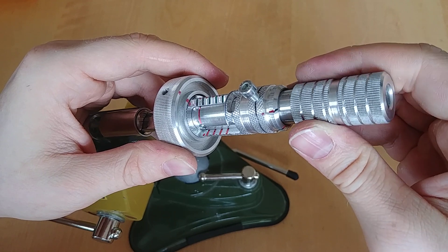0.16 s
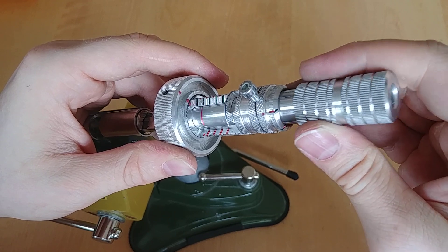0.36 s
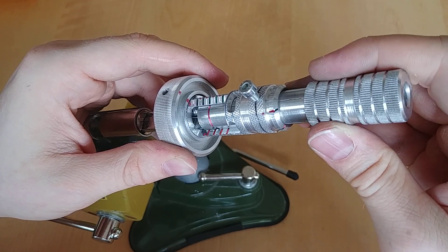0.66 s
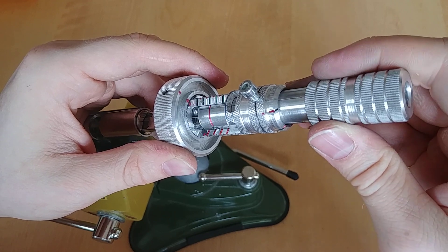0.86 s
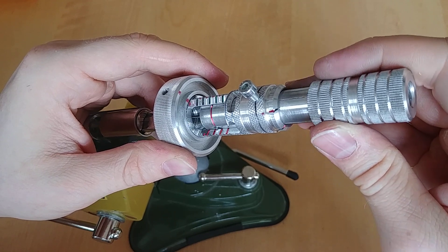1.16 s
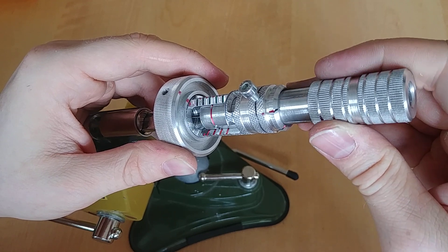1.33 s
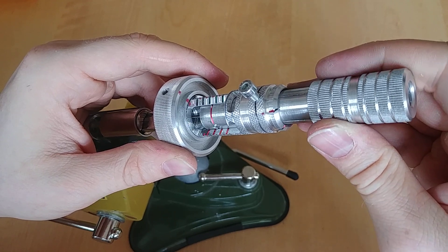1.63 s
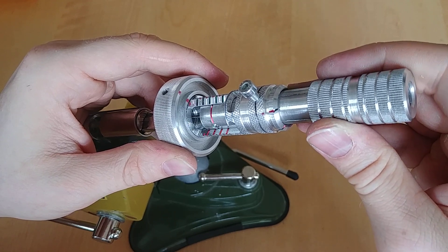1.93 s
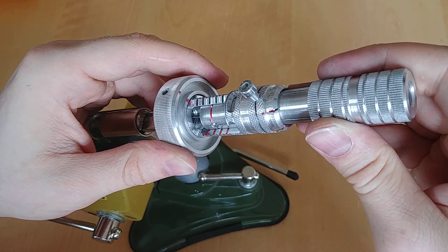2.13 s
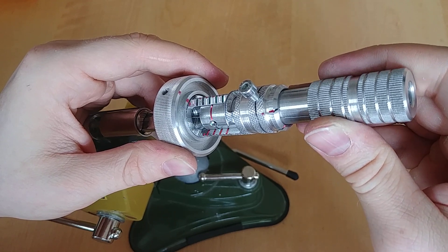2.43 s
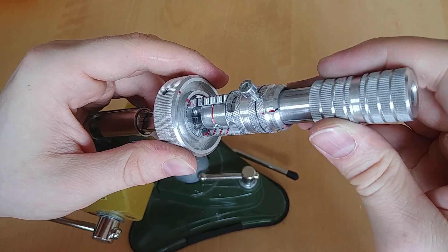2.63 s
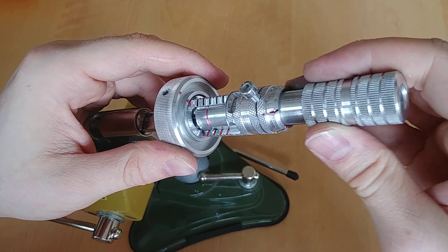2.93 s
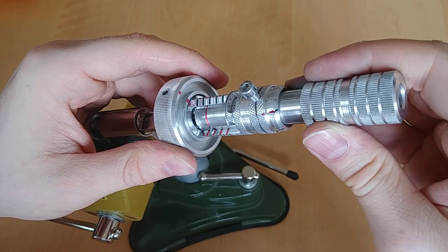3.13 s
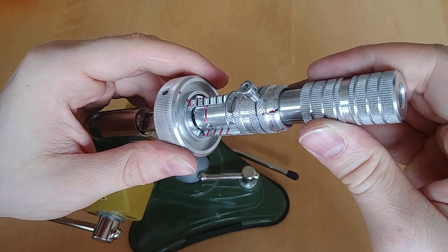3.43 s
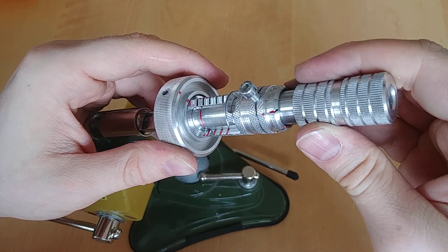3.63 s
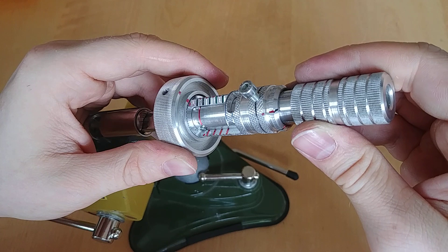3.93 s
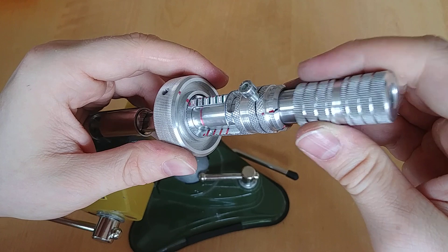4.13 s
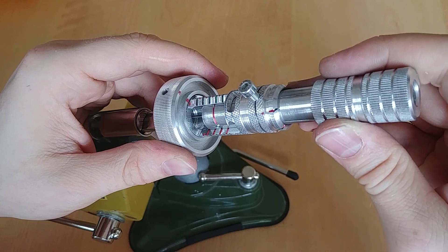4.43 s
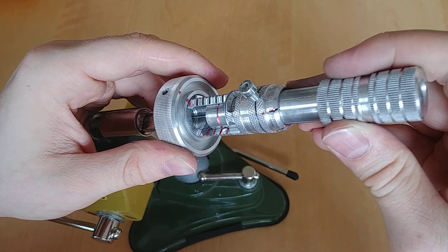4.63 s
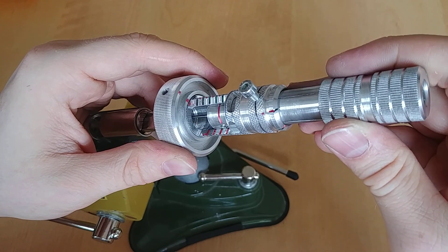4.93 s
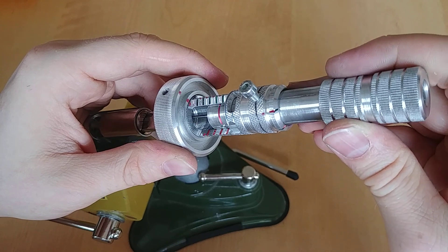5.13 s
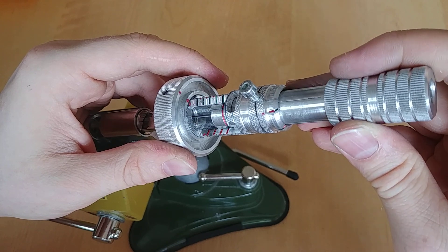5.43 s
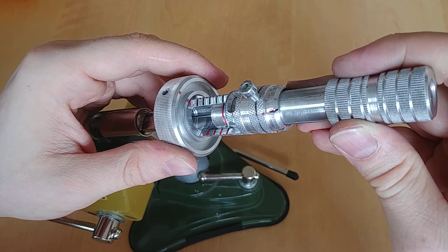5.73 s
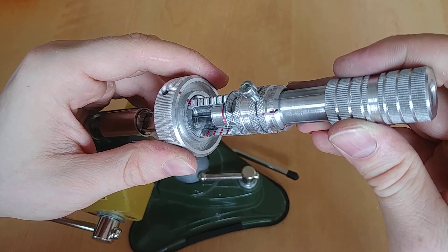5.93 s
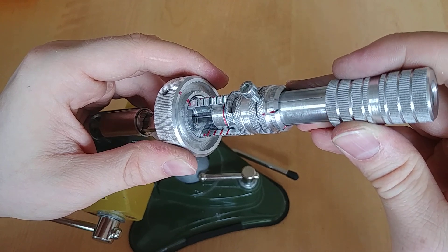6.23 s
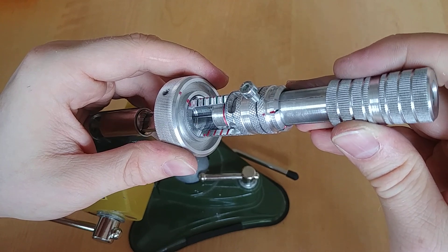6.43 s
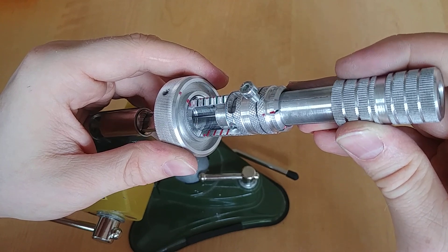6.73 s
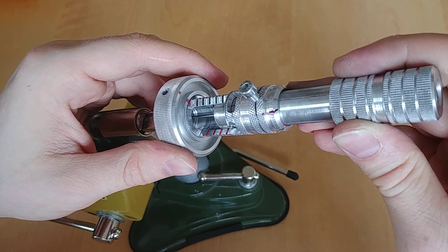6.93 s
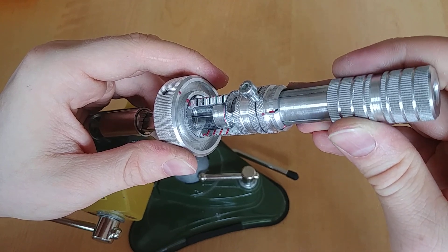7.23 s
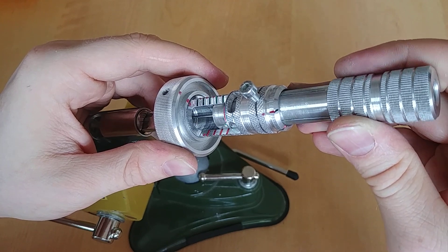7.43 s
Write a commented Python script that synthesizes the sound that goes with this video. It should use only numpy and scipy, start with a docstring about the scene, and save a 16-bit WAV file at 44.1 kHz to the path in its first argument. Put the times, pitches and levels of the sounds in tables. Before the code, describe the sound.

A steel lockpick ticks lightly over lock discs, snaps loudly once, then clicks in small clusters, with a later bench thump and tiny creaks.

```python
"""A steel pick scrapes along the discs of a lock and drops off their edges with bright clicks, one a hard snap.
Clicks are choked sine rings with chatter; scrapes are grainy noise through the resonances of pick and lock. The
vise that holds the lock knocks on a wooden bench (cracks over damped modes), its clamp creaks in slips, the
handle ticks, fingers rustle, and the pick's strokes stir low rumbles in the bench. A small room answers with a
noise tail, over wavering rumble and hiss. Two close microphone ports: the steel is nearer the left one, and the
right one is shaded and later."""
import sys
import numpy as np
from scipy import signal
from scipy.fft import rfft, irfft, next_fast_len
from scipy.io import wavfile

SR = 44100
rng = np.random.default_rng(int(sys.argv[2]) if len(sys.argv) > 2 else 0)


def wav_out(sig):
    """Save sig, one row per channel (or a flat mono array), as 16-bit PCM at SR to the path in sys.argv[1]."""
    wavfile.write(sys.argv[1], SR, np.round(np.clip(np.atleast_2d(sig).T, -1, 1) * 32767).astype(np.int16))


N = 334354  # length in samples

# pick dropping off a disc: t/s, level/dB (also the force of the blow), ring f/Hz, chatter against ring level/dB
CLICK_EVENTS = [(0.4255, -21, 7340, -19), (0.5497, -37, 8140, -15), (2.2001, -2, 7383, 1),
                (2.9724, -34, 6200, 6), (2.984, -43, 7900, 9), (3.630, -30, 6940, 5),
                (3.6386, -29, 7900, -4), (3.6445, -26.5, 8000, -3.5), (4.1632, -42.5, 7740, -10),
                (4.1903, -24.5, 7430, -6), (4.198, -24, 7250, -2), (4.2450, -29, 8300, -3),
                (4.4541, -39, 7870, -5), (5.2627, -34.5, 7060, -3), (6.5371, -27, 6700, 10)]
# strokes of the pick: greatest force t/s, build-up t/s, run-out t/s, level before the swell/dB, pressure/0-1
STROKE_EVENTS = [(0.436, 0.032, 0.02, -54.5, 0.39), (0.552, 0.058, 0.024, -57, 0.42),
                 (1.046, 0.018, .025, -73, 0.4), (1.57, .05, 0.066, -72.5, 0.6),
                 (2.612, .025, .015, -72, 0.4), (2.69, 0.028, 0.049, -72.5, 0.55),
                 (2.977, 0.034, 0.012, -46, .6), (3.64, 0.03, 0.029, -47.5, 1), (4.203, .026, .03, -50, .4),
                 (4.248, 0.038, 0.026, -50, 1), (4.405, 0.012, 0.017, -51, 0.49),
                 (4.46, 0.025, 0.015, -60.5, 0.5), (4.685, .03, .03, -66.5, 0.36),
                 (5.274, 0.018, 0.019, -56, 0.26), (6.535, .011, 0.023, -44.5, .55)]
# crowded resonances of pick and lock: f/Hz, level/dB
STEEL_CURVE = [(400, -39), (1250, -37), (1850, -22), (3000, -18), (4200, -13.5), (5000, -14.5), (6100, -7),
               (6800, -6.5), (7350, 3.5), (8300, 4.5), (9000, -12), (10000, -36), (12500, -32),
               (14500, -26)]
# lock housing, heard when the pick bears down: f/Hz, level/dB
HOUSING_CURVE = [(300, -37), (1500, -3.5), (2900, 3.5), (3850, 5), (4600, -0.5), (5400, -13), (7000, 0),
                 (10500, -78), (12600, -9), (13900, -11), (15500, -31)]
# vise rocking on the bench, or thumped by the pick's strokes: t/s, thump peak level/dB, crack against thump
# level/dB
KNOCK_EVENTS = [(3.652, -54, -25), (3.744, -47.5, -13), (4.209, -54.5, -18), (4.695, -61, -4.5),
                (4.947, -54.5, -13), (5.279, -52, -10), (5.718, -24.5, -5.5), (6.805, -51.5, -15),
                (7.252, -55, -25)]
# thump modes of vise and bench: f/Hz, level/dB, 60 dB decay t/s
BENCH_MODES = [(62, -11, 0.11), (137.4, -3, 0.039), (180, -3, 0.051), (549, -23, 0.072)]
# dry crack of the vise foot: f/Hz, level/dB
CRACK_CURVE = [(150, -14), (380, -7.5), (570, 0.5), (880, -14.5), (1270, -4.5), (1750, -6), (2250, -12),
               (2700, -5), (3300, -27.5), (5000, -32), (8000, -57.5)]
# vise frame, rung when its foot strikes: f/Hz, level/dB, 60 dB decay t/s
FRAME_MODES = [(1280, 12, 0.069), (1580, -14, 0.051), (1680, 3, 0.088), (1990, 21, 0.035), (2550, -3, 0.04),
               (2930, -10, 0.04)]
# creaks of the clamp under load: start t/s, length t/s, first slip level/dB, starting f/Hz
CREAK_EVENTS = [(5.262, .025, -43.5, 720), (5.305, 0.029, -47, 860), (5.3512, .06, -46, 850),
                (7.041, 0.043, -49, 2300)]
# lone ticks of the handle: t/s, peak level/dB, centre f/Hz
TICK_EVENTS = [(5.1565, -48.5, 13500), (7.144, -53, 5200)]
# soft rubs: fingers shifting, and low bench rumble stirred by the pick's strokes: middle t/s, half length at
# half height t/s, level before the swell/dB, centre f/Hz
RUB_EVENTS = [(1.1, 0.11, -78, 450), (3.698, .06, -62.5, 73.6), (4.15, 0.018, -66.5, 396),
              (4.247, .08, -62, 87), (4.449, 0.049, -66.5, 365), (4.917, 0.049, -71, 1430),
              (5.651, .01, -70.5, 1720), (6.95, 0.24, -73, 415), (7.073, 0.014, -68, 1470)]
# vise base, stirred by each click: f/Hz, level/dB, 60 dB decay t/s
BASE_MODES = [(393, -3.5, 0.0734), (505, -3, 0.034), (653.6, -5, 0.14), (720, -2.5, 0.07)]
# hollow answer of the bench to the pick: f/Hz, level/dB
HOLLOW_CURVE = [(40, -8.5), (100, 5.5), (300, -10.5), (410, 7.5), (520, -3), (740, -2), (950, -16),
                (1800, -21.5), (4000, -28.5)]
# right port, facing away from the lock: f/Hz, level/dB
SHADE_CURVE = [(200, -3), (2000, -1.5), (5600, -2.5), (7150, -19.5), (8400, -6.5), (9200, 17), (14000, -4)]
# room background, relative spectrum: f/Hz, level/dB per Hz
AIR_CURVE = [(13, -38.5), (22, -6.5), (53, -2), (124, -10.5), (203, -12.5), (246, -16.5), (282, -20),
             (414, -20), (698, -25), (918, -28), (1180, -28.5), (1550, -31.5), (5930, -36), (9460, -44.5),
             (15500, -40)]
# background, side against mid: f/Hz, level/dB
AIR_SIDE_CURVE = [(50, -7), (180, -4.5), (500, 0), (1500, 0), (8000, 0.5)]

# chatter time of a 0 dB blow; it halves for a blow this much softer
CONTACT_MS, CONTACT_HALVING_DB = 5.02, 52.5
ROOM_DB_PER_BLOW_DB = 0.28  # extra room share for each dB of blow
STROKE_SHAPE = 2.04  # 1 = pointed swell, 2 = rounded
SLIP_GAP_S, SLIP_JITTER, SLIP_SCATTER_DB = 0.02, 0.056, 0.5  # typical gap, its unevenness, spread of strength
CREAK_RISE_OCT_PER_S, CREAK_FADE_DB_PER_S = 1.8, 55  # as it tightens the slips get higher and weaker
GROAN_HZ, GROAN_DB = 114, -12  # bench groan under a creak; level before its swell, against the first slip
ROOM_T60_S, ROOM_TOP_T60_S = 0.37, 0.16  # decay by 60 dB, below and above 10 kHz
CLICK_RIGHT_DB, PORT_LAG_MS = -2.5, 0.2  # clicks at the right port before shading; lag of the steel there
AIR_DB = -65.5  # rms of the background's mid, before the waver
TOP_HZ = 15800  # upper limit of the microphone


def clicks(rise_ms=0.24, edge_db=-16, hardening=0.37, room_db=-11.5):
    """The tip chatters and rings until the grip chokes it; returns direct sound and room share."""
    direct, radiated = np.zeros(N), np.zeros(N)
    t = clock(0.03)
    ms = t * 1000
    for s, db, hz, chatter_db in CLICK_EVENTS:
        contact_ms = CONTACT_MS * 2 ** (db / CONTACT_HALVING_DB)
        held = np.exp(-(ms / contact_ms) ** 3)
        envelope = (1 - np.exp(-ms / rise_ms)) * held
        force = burst(envelope)
        # a harder blow has a sharper edge, so it carries more treble
        edge = undb(edge_db + hardening * db) * matched(np.diff(force, prepend=0), envelope)
        chatter = matched(shaped(force, STEEL_CURVE), envelope) + edge
        ring = envelope * np.sin(2 * np.pi * hz * t)
        click = undb(db) * matched(ring + undb(chatter_db) * chatter, envelope)
        add(direct, s, click)
        # a harder blow also shakes the whole lock, which feeds the room more
        add(radiated, s, undb(room_db + ROOM_DB_PER_BLOW_DB * db) * click)
    return direct, radiated


def scrapes(grain_db=4, housing_db=-3):
    """Tiny uneven slips ring the steel in swelling strokes; more pressure brings in the housing."""
    t = np.arange(N) / SR
    slips = rng.standard_normal((3, N)) * undb(grain_db * walk(900))
    steel = unit(shaped(slips[0], STEEL_CURVE))
    housing = unit(shaped(slips[1], HOUSING_CURVE))
    light = unit(band(slips[2], 7700, 920))  # a narrow whisper at light pressure
    out = np.zeros(N)
    for s, build_s, run_out_s, db, pressure in STROKE_EVENTS:
        away = np.maximum((s - t) / build_s, (t - s) / run_out_s)
        on = away < 4
        pressure = np.clip(pressure, 0, 1)
        pressed = steel[on] + undb(housing_db) * housing[on]
        sound = (1 - pressure) * light[on] + pressure * pressed
        swell = np.exp(-away[on] ** STROKE_SHAPE)
        out[on] += undb(db) * swell * unit(sound)
    return out


def knocks(push_s=0.0027, frame_db=-8, grit_db=-1):
    """The vise rocks or is thumped by a stroke: its foot cracks on the wood, its frame rings and the bench
    thumps."""
    out, t = np.zeros(N), clock(0.3)
    thump = sum(undb(db - 60 * t / t60) * np.sin(2 * np.pi * hz * t) for hz, db, t60 in BENCH_MODES)
    thump = thump * (1 - np.exp(-t / push_s)) ** 2  # soft onset
    thump = thump / np.abs(thump).max()
    # the foot grinds for a few ms as it settles
    envelope = (1 - np.exp(-t / 0.0004)) * np.exp(-(t / 0.008) ** 2)
    frame = undb(frame_db) * ringing(FRAME_MODES, t)
    for s, db, crack_db in KNOCK_EVENTS:
        grit = matched(shaped(burst(envelope), CRACK_CURVE), envelope)
        crack = frame + undb(grit_db) * grit
        add(out, s, undb(db) * (thump + undb(crack_db) * crack))
    return out


def creaks(rub_db=-21):
    """The clamp sticks and slips at a nearly even rate, rubs in between, and the bench groans along."""
    out = np.zeros(N)
    for start, length, db, hz in CREAK_EVENTS:
        age = 0
        for gap, size in rng.standard_normal((32, 2)):
            if age < length:
                strength = undb(db - CREAK_FADE_DB_PER_S * age + SLIP_SCATTER_DB * size)
                pitch = hz * 2 ** (CREAK_RISE_OCT_PER_S * age)
                add(out, start + age, strength * slip(pitch))
            age += SLIP_GAP_S * np.exp(SLIP_JITTER * gap)
        rub = undb(rub_db) * rustle(2 * length, hz)
        groan = undb(GROAN_DB) * rustle(2 * length, GROAN_HZ)
        add(out, start - length / 2, undb(db) * (rub + groan))
    return out


def ticks_and_rubs():
    """The handle ticks now and then; fingers shifting give a soft rustle, and the pick's strokes stir low
    rumbles in the bench."""
    out = np.zeros(N)
    for s, db, hz in TICK_EVENTS:
        add(out, s, undb(db) * slip(hz))
    for s, half_s, db, hz in RUB_EVENTS:
        add(out, s - 2 * half_s, undb(db) * rustle(4 * half_s, hz))
    return out


def base(gain_db=-37.5, lag_s=0.007):
    """Every click travels down the vise and rings the damped modes of its base."""
    out, ring = np.zeros(N), ringing(BASE_MODES, clock(0.15))
    for s, db, *_ in CLICK_EVENTS:
        add(out, s + lag_s, undb(db + gain_db) * ring)
    return out


def hollow(steel, gain_db, lag_s=0.0065, smear_s=0.01):
    """Each push of the pick travels down the vise and stirs the bench a moment later."""
    keep = np.exp(-1 / (smear_s * SR))
    power = steel ** 2 + 1e-18
    push = np.sqrt(signal.lfilter([1 - keep], [1, -keep], power))  # smoothed level
    wood = unit(shaped(rng.standard_normal(N), HOLLOW_CURVE))
    out = np.zeros(N)
    add(out, lag_s, undb(gain_db) * push * wood)
    return out


def room(x, gap_s=0.00684, desk_s=0.013, desk_db=-11):
    """After a short gap comes a dense tail with one desk reflection in it; its top dies sooner."""
    t = clock(0.6)
    noise = rng.standard_normal(len(t))
    low = signal.sosfiltfilt(signal.butter(4, 10000, fs=SR, output="sos"), noise)
    top = noise - low
    tail = low * undb(-60 * t / ROOM_T60_S) + top * undb(-60 * t / ROOM_TOP_T60_S)
    tail = tail * (t > gap_s)
    tail /= np.sqrt(np.sum(tail ** 2))
    tail[int(desk_s * SR)] += undb(desk_db)
    return signal.fftconvolve(x, tail)[:N]


def background(waver_db=0.67):
    """Low rumble wavers under a smooth hiss; a weaker side signal makes the bass more alike at both ports."""
    mid, side = (unit(colour(rng.standard_normal(N), AIR_CURVE)) for _ in range(2))
    air = mid + colour(side, AIR_SIDE_CURVE) * np.array([[1], [-1]])
    rumble = signal.sosfiltfilt(signal.butter(2, 600, fs=SR, output="sos"), air)
    waver = undb(waver_db * walk(6.1))
    return undb(AIR_DB) * (air + rumble * (waver - 1))


def slip(hz, breadth=2.2, skin_ratio=1.63):
    """One slip: a band-passed impulse, dulled by the soft skin of the hand, with a peak of one."""
    skin = signal.butter(6, min(hz * skin_ratio, TOP_HZ), fs=SR, output="sos")
    snap = band(signal.unit_impulse(512), hz, min(hz * breadth, 3000))
    tick = signal.sosfilt(skin, snap)
    return tick / np.abs(tick).max()


def rustle(seconds, hz, breadth=1.35):
    """Rubbing: band-passed noise of unit rms under a soft swell."""
    swell = np.hanning(int(seconds * SR))
    return swell * unit(band(rng.standard_normal(len(swell)), hz, hz * breadth))


def burst(envelope):
    """A flurry of micro-impacts that excites all frequencies about evenly."""
    spectrum = rfft(envelope * rng.standard_normal(len(envelope)), 2 * len(envelope))
    flat = irfft(spectrum / np.abs(spectrum))[:len(envelope)]
    return flat * (envelope / envelope.max()) ** (1 / 8)


def ringing(modes, t):
    """Damped modes after a blow, alternating in sign, with a peak of one."""
    ring = np.zeros(len(t))
    for k, (hz, db, t60) in enumerate(modes):
        ring += (-1) ** k * undb(db - 60 * t / t60) * np.sin(2 * np.pi * hz * t)
    return ring / np.abs(ring).max()


def shaped(x, points):
    """Pass a force through a body with this (Hz, dB) curve; it rings only after it is pushed."""
    size = 2048
    f = np.arange(size // 2 + 1) * SR / size
    hz, db = np.transpose(points)
    gain = undb(np.interp(np.log(f + 1), np.log(hz), db))
    # folding the cepstrum gives the minimum-phase response
    cepstrum = irfft(np.log(gain))[:size // 2]
    cepstrum[1:] *= 2
    response = irfft(np.exp(rfft(cepstrum, size)))
    return signal.fftconvolve(x, response)[:len(x)]


def colour(x, points, lag_ms=0):
    """Shape a sound by a (Hz, dB) curve and delay it."""
    size = next_fast_len(N + SR)
    f = np.arange(size // 2 + 1) * SR / size
    hz, db = np.transpose(points)
    gain = undb(np.interp(np.log(f + 1), np.log(hz), db))
    delay = np.exp(-2j * np.pi * f * lag_ms / 1000)
    return irfft(rfft(x, size) * gain * delay, size)[:N]


def band(x, hz, width_hz):
    """A resonance applied twice for steep skirts; the width lies about 9.5 dB down."""
    hz = min(hz, SR * 0.45)
    b, a = signal.iirpeak(hz, hz / width_hz / np.sqrt(1 / 2), fs=SR)
    return signal.lfilter(b, a, signal.lfilter(b, a, x))


def walk(rate):
    """Random points at this rate per second, joined by straight lines; spread near one."""
    points = rng.standard_normal(int(N / SR * rate) + 2)
    return np.interp(np.arange(N) / SR * rate, np.arange(len(points)), points)


def matched(x, envelope):
    """Give a burst the energy of a tone with this envelope."""
    return unit(x) * np.sqrt(np.mean(envelope ** 2) / 2)


def undb(db):
    """Decibels to gain."""
    return 10 ** (np.asarray(db) / 20)


def unit(x):
    """Scale to an rms of one."""
    return x / np.sqrt(np.mean(x ** 2))


def clock(seconds):
    """Sample times of a short sound."""
    return np.arange(int(seconds * SR)) / SR


def add(track, s, sound):
    """Mix a sound into a track at a time in seconds."""
    start = int(s * SR)
    track[start:start + len(sound)] += sound[:len(track) - start]


def scene(scrape_room_db=-19, wood_room_db=-10, scrape_right_db=-3, room_low_hz=250):
    """Steel sits to the left and reaches the right port later; wood is in the middle, room all around."""
    click, radiated = clicks()
    scrape = scrapes()
    wood = knocks() + creaks() + ticks_and_rubs() + base()
    wood = wood + hollow(click, gain_db=-32) + hollow(scrape, gain_db=-17.5)
    send = radiated + undb(scrape_room_db) * scrape + undb(wood_room_db) * wood
    # so small a source sends little bass into the room
    send = signal.sosfilt(signal.butter(1, room_low_hz, "high", fs=SR, output="sos"), send)
    # each port gets its own random tail
    left = click + scrape + wood + room(send)
    far_steel = undb(CLICK_RIGHT_DB) * click + undb(scrape_right_db) * scrape
    right = colour(far_steel, SHADE_CURVE, lag_ms=PORT_LAG_MS) + colour(wood + room(send), SHADE_CURVE)
    return np.array([left, right]) + background()


def record(dry):
    """The microphone sheds the deepest rumble, clips at full scale and cuts off the top."""
    sound = signal.sosfilt(signal.butter(3, 30, "high", fs=SR, output="sos"), dry)
    clipped = np.clip(sound, -1, 1)
    return signal.sosfilt(signal.ellip(12, 0.2, 95, TOP_HZ, fs=SR, output="sos"), clipped)


dry = scene()
out = record(dry)
wav_out(out)
```